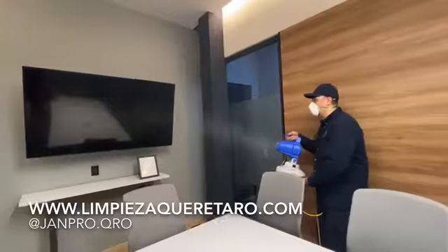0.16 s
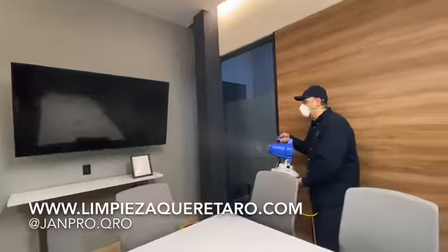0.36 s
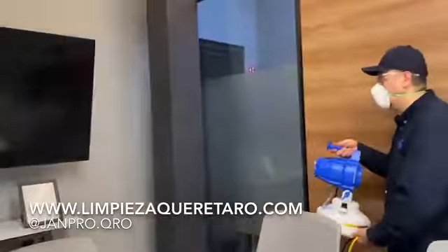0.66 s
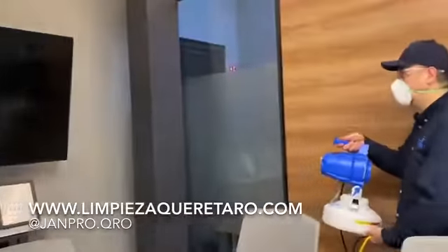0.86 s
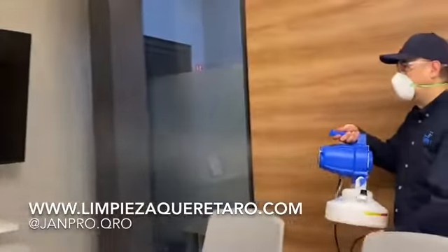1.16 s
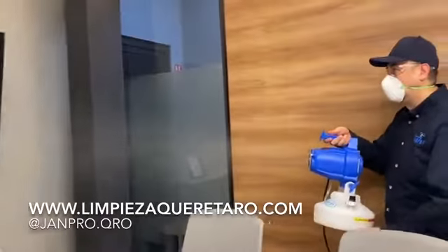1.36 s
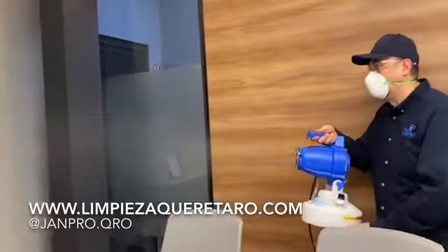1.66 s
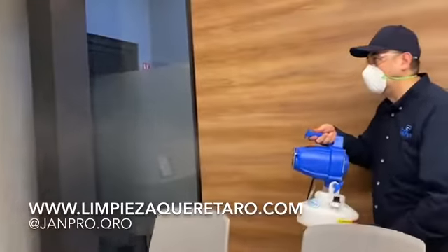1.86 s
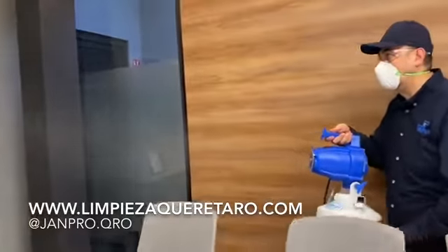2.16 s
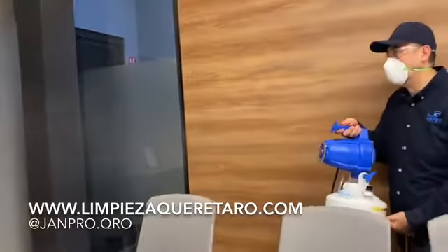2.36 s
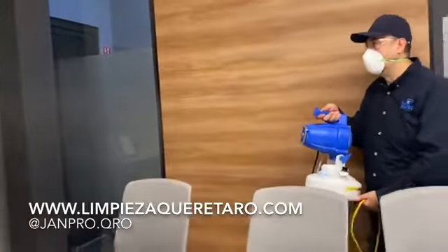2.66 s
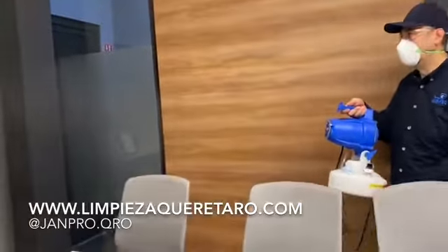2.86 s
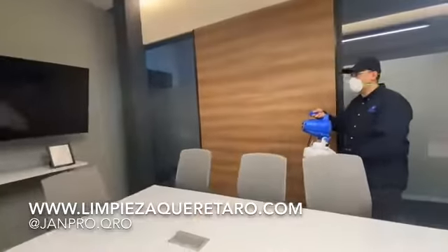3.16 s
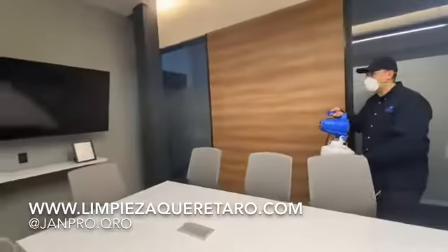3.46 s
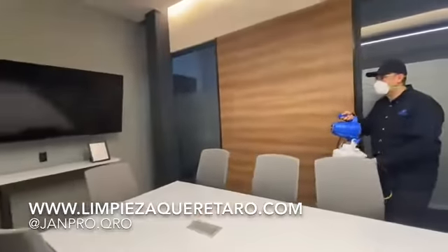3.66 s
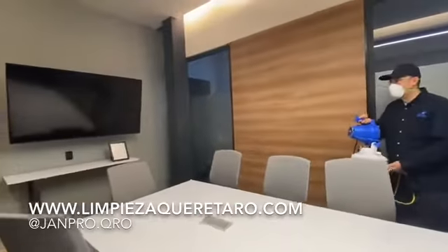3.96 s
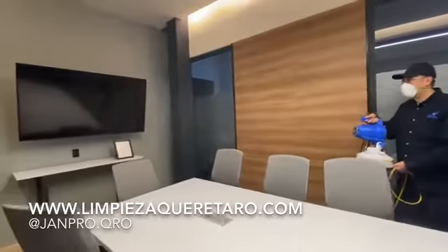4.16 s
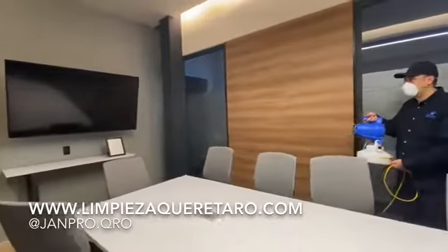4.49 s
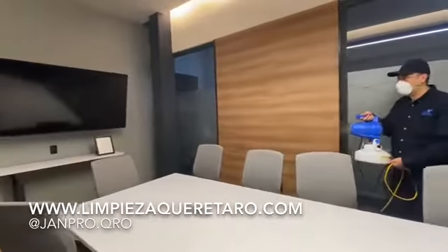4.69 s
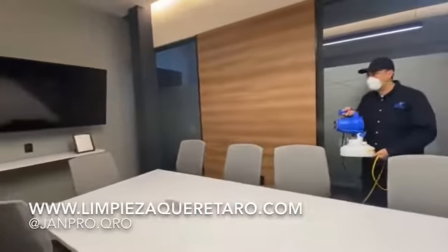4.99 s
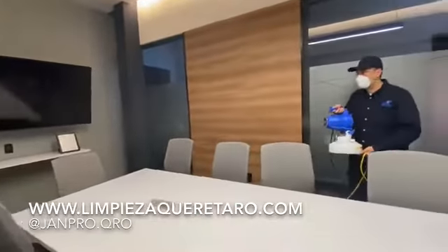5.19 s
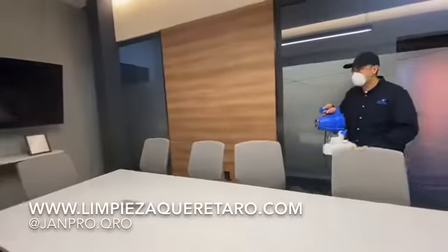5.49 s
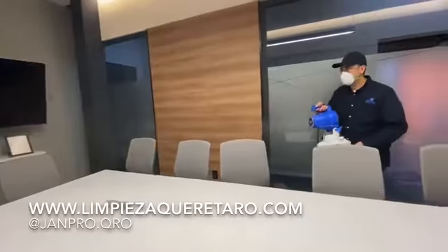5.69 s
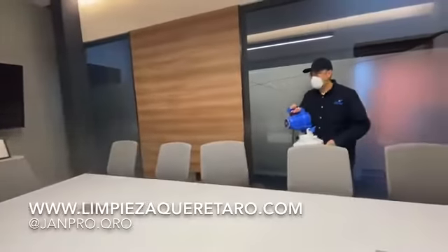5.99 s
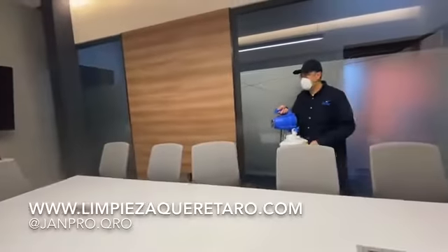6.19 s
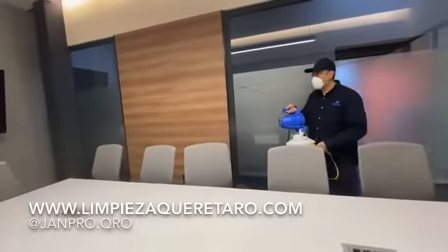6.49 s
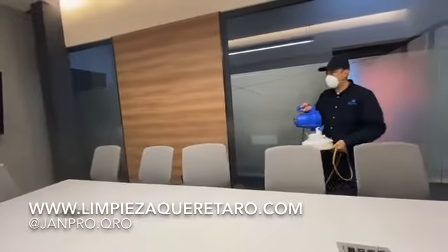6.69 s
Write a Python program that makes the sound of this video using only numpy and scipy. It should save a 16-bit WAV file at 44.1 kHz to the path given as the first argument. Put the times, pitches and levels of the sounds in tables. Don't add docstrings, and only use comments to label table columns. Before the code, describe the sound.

For about 6.8 seconds a handheld electric fogger runs without pause in a carpeted meeting room, a few metres from a stereo phone microphone. A dense, bright air-jet hiss fills the upper range at almost constant level, subtly flickering as room echoes shift with the walking operator. Far below it sits a dull, low-mid housing roar with little deep bass. From about 0.7 to 3.0 seconds the pickup narrows, changing stereo spread and colour slightly without a real loudness jump; then it opens wide again. A faint fan tone near 1170 hertz swells every fraction of a second, drifting between sides and rising almost imperceptibly. A needle-thin whine around 10.5 kilohertz flashes irregularly, notably at 0.6 seconds, then strongest on the left near 4.2, 5.2 and 6.2. Very faint motor hum lies buried. The sound cuts off mid-spray.

```python
import sys
import numpy as np
from scipy import signal
from scipy.fft import rfft, irfft, next_fast_len
from scipy.io import wavfile
from scipy.ndimage import uniform_filter1d

SR = 44100
rng = np.random.default_rng(int(sys.argv[2]) if len(sys.argv) > 2 else 0)


def generate_wav(signal):
    frames = np.transpose(np.atleast_2d(signal))
    scaled = np.clip(frames, -1, 1) * 32767
    pcm = np.round(scaled).astype(np.int16)
    wavfile.write(sys.argv[1], SR, pcm)


def voltage_ratio(level):
    return 10 ** (np.asarray(level, float) / 20)


N = 301644

# t/s, jet level/dB
FLOW = [(0.0, -39), (.65, -39), (.75, -40), (1.6, -39.5), (2.97, -40), (3.03, -39.5), (3.8, -39.9),
        (4.15, -39.6), (5.2, -39.5), (5.6, -39.5), (6.1, -39.5), (6.84, -39.5)]
# t/s, zoom/0-1
ZOOM = [
    (0, 0.04),
    (.67, 0),
    (.72, 0.98),
    (2.97, 0.96),
    (3.02, 0),
    (6.84, 0.01),
]
# f/Hz, density/dB per Hz
JET_WIDE = [(700, -51.5), (1400, -14), (2000, -10), (2700, -10.5), (3200, -6.5), (4600, -7), (5400, -4.5),
            (7000, -6.5), (8600, -5), (9700, -1), (10500, 1), (12000, -1.5), (13200, 0.6), (15600, -4)]
JET_ZOOMED = [(700, -45), (1400, -13), (2000, -9.5), (2700, -11.5), (3200, -7), (4600, -6), (5400, -3.5),
              (7000, -4), (8600, -3), (9700, -1), (10500, 1), (12000, -0.9), (13200, 0.6), (15600, -1)]
# f/Hz, density/dB per Hz
ROAR = [(15, -76), (25, -46), (91, -25), (157, -19), (229, -14), (370, -12.5), (498, -10.5), (569, -4.5),
        (1080, -1), (1160, -3.5), (1300, -5.5), (1690, -30), (2860, -120)]
# f/Hz, width/Hz, lift/dB
HOUSING = [(108, 9.9, 7), (157, 13, 1), (322, 13, 4.5), (378, 7.2, 5), (433.3, 6.5, 9.5), (482, 8, 5.5),
           (573, 12, 3.5)]
# f/Hz, likeness/0-1, left lead/rad, left minus right/dB
PAIR_WIDE = [(120.0, 0.82, 0.0, 0.0), (350.0, 0.68, 0.2, -0.4), (750.0, 0.71, 0.1, 1.0),
             (1000.0, 0.42, 0.1, 1.1), (1500.0, 0.06, 0.2, 2.0), (2800.0, 0.23, -2.7, 1.3),
             (4400.0, 0.2, -2.9, -0.4), (6000.0, 0.11, -5.4, 0.8), (9000.0, 0.12, -5.9, 1.9),
             (10300.0, 0.18, -2.8, 2.7), (11200.0, 0.29, -0.5, 2.3), (12800.0, 0.42, 0.7, 0.8),
             (14200.0, 0.28, 2.9, 0.5), (15500.0, 0.25, 3.9, -0.8)]
PAIR_ZOOMED = [(120.0, 0.82, -0.0, -0.1), (350.0, 0.85, 0.1, -0.7), (750.0, 0.8, 0.2, 0.2),
               (1000.0, 0.59, 0.3, 0.3), (1500.0, 0.42, 0.5, 1.4), (2800.0, 0.24, -0.5, -0.0),
               (4400.0, 0.19, -0.5, 0.2), (6000.0, 0.28, 0.5, -0.2), (9000.0, 0.39, 0.1, 0.5),
               (10300.0, 0.22, -0.4, 1.2), (11200.0, 0.2, -1.1, 1.0), (12800.0, 0.53, 0.3, -1.0),
               (14200.0, 0.28, -1.5, -1.6), (15500.0, 0.52, -1.9, -0.8)]
# t/s, blade rate f/Hz
SPEED = [
    (0.0, 1170.2),
    (2.8, 1169.9),
    (4.0, 1172.5),
    (4.8, 1172.9),
    (5.6, 1172.2),
    (6.84, 1173.5),
]
# t/s, length/s, left level/dB, right level/dB, left lead/rad
BLADE = [(0.1, .45, -59, -53, -2.8), (.57, .33, -56, -54, -3.0), (.91, .31, -58, -49, -.3),
         (1.17, .31, -53, -53, 0.0), (1.65, .55, -58, -51, -.7), (2.22, .4, -72, -50, -2.0),
         (2.5, .35, -50, -70, -1.5), (2.78, .2, -62, -60, -.5), (3.06, .36, -51, -49, .7),
         (3.75, .6, -57, -52, 2.5), (4.42, .36, -59, -55, 4.7), (4.67, .26, -50, -56, 7.4),
         (4.85, .31, -48, -65, 3.8), (5.2, .42, -55, -52, 3.6), (5.58, .42, -51, -54, 6.8),
         (5.92, .44, -54, -56, 3.6), (6.23, .32, -53, -58, 5.2), (6.48, .25, -56, -52, 3.9),
         (6.74, .23, -53, -68, 4.9)]
# t/s, length/s, left level/dB, right level/dB, left lead/rad
COMMUTATOR = [(.35, .12, -47, -50, 5.0), (.58, .18, -39, -41, 5.5), (.87, .19, -48, -49, 7.4),
              (1.41, .16, -44, -58, 4.5), (1.74, .22, -45, -49, 2.0), (2.1, .3, -45, -49, 1.2),
              (2.6, .2, -43, -47, .7), (3.04, .14, -41, -48, 4.1), (3.47, .3, -43, -45, 3.9),
              (3.67, .11, -40, -47, 1.0), (3.86, .18, -45, -52, 4.5), (4.19, .18, -37, -49, 5.8),
              (4.48, .22, -46, -48, 5.0), (4.81, .24, -42, -54, 5.3), (5.16, .28, -33, -47, 1.9),
              (5.64, .15, -38, -50, 4.4), (6.23, .2, -33, -41, 4.9), (6.49, .2, -41, -47, 4.1),
              (6.75, .18, -41, -44, 4.1)]
# t/s, 4th
# order level/dB, 12th order level/dB
SHAFT_ORDERS = [(0.0, -72, -58), (1.2, -70, -65), (3.5, -73, -67), (3.9, -65, -66), (4.7, -63, -68),
                (5.75, -70, -64), (6.05, -66, -57), (6.55, -57, -61), (6.84, -61, -63)]
# t/s, level/dB
HUM = [(0.0, -79), (.6, -81), (1.1, -76), (1.9, -78), (2.3, -72), (3.2, -69), (4.6, -67), (4.8, -72),
       (5.3, -69.5), (6.0, -83), (6.47, -71), (6.84, -78)]

ROAR_BELOW_JET_DB, ROAR_GUST_DB = -19.5, 1.0
EDGE_HZ = 9500
EDGE_WIDE_DB, EDGE_ZOOMED_DB, EDGE_SWAY_DB = 1.4, .3, .25
WHINE_BED_DB, WHINE_FADE_DB, WHINE_SWAY_RAD = -54, 4.0, 1.5
HUM_HZ, HUM_FLUTTER_DB = 240.0, 1.1
LOW_CUT_HZ, CUTOFF_HZ = 46, 15730


def air_flow():
    jet_db, = in_time(FLOW)
    zoom = np.clip(in_time(ZOOM)[0], 0, 1)
    roar_db = jet_db + ROAR_BELOW_JET_DB + ROAR_GUST_DB * drift(8.2)
    edge_db = EDGE_WIDE_DB * (1 - zoom) + EDGE_ZOOMED_DB * zoom + EDGE_SWAY_DB * drift(6.0)
    out = 0
    for weight, jet, pair in ((1 - zoom, JET_WIDE, PAIR_WIDE), (zoom, JET_ZOOMED, PAIR_ZOOMED)):
        hiss = jet_hiss(jet, pair, jet_db, edge_db)
        roar = voltage_ratio(roar_db) * housing_roar(pair)
        out = out + np.sqrt(weight) * (hiss + roar)
    return out


def jet_hiss(jet, pair, jet_db, edge_db):
    centres_hz = np.geomspace(1200, 15000, 6)
    gains = [voltage_ratio(jet_db + edge_db * (centre > EDGE_HZ)) for centre in centres_hz]
    hz, both = air(jet, pair, 1400, 9000)
    return gusty(hz, both, centres_hz, gains, patchy_db=.15)


def gusty(hz, both, centres_hz, gains, patchy_db):
    out = 0
    for k, gain in enumerate(gains):
        share = np.interp(np.log(hz + 1), np.log(centres_hz), np.arange(len(centres_hz)) == k)
        flicker = voltage_ratio(patchy_db * (drift(3.1) + drift(18.0)))
        band = irfft(share * both, next_fast_len(N))[:, :N]
        out = out + gain * flicker * band
    return out


def housing_roar(pair):
    hz, both = air(ROAR, pair, 340, 937)
    lift_db = 0
    for centre_hz, width_hz, db in HOUSING:
        lift_db = lift_db + db / (1 + (2 * (hz - centre_hz) / width_hz) ** 2)
    return irfft(both * voltage_ratio(lift_db), next_fast_len(N))[:, :N]


def air(spectrum, pair, low_hz, high_hz):
    size = next_fast_len(N)
    hz = np.arange(size // 2 + 1) * SR / size
    shared, own = rfft(rng.standard_normal((2, size)))
    alike, lead_rad, pan_db = at_hz(pair, hz)
    alike = np.clip(alike, 0, .97) ** .8
    colour = voltage_ratio(at_hz(spectrum, hz)[0])
    right_noise = alike * np.exp(-1j * lead_rad) * shared + np.sqrt(1 - alike ** 2) * own
    left = colour * voltage_ratio(pan_db / 2) * shared
    right = colour * voltage_ratio(-pan_db / 2) * right_noise
    inside = (hz > low_hz) & (hz < high_hz)
    mid_rms = np.sqrt(2 * np.sum(np.abs(left + right)[inside] ** 2) / 4) / size
    return hz, np.array([left, right]) / mid_rms


def motor():
    blade_rad = 2 * np.pi * np.cumsum(in_time(SPEED)[0]) / SR
    return blade_tone(blade_rad) + commutator_whine(blade_rad) + shaft_orders(blade_rad) + mains_hum()


def blade_tone(blade_rad):
    return np.imag(swells(BLADE) * np.exp(1j * blade_rad))


def commutator_whine(blade_rad):
    whine_rad = 9 * blade_rad + .25 * drift(8.0)
    flashes = np.imag(swells(COMMUTATOR) * np.exp(1j * whine_rad))
    left_db = WHINE_BED_DB + WHINE_FADE_DB * drift(5.0)
    right_db = WHINE_BED_DB + WHINE_FADE_DB * drift(5.0)
    bed_rad = whine_rad + WHINE_SWAY_RAD * drift(2.0)
    bed = tone(bed_rad, left_db, right_db, WHINE_SWAY_RAD * drift(3.0))
    return voltage_ratio(2.0 * drift(22.0)) * (flashes + bed)


def shaft_orders(blade_rad):
    fourth_db, twelfth_db = np.array(in_time(SHAFT_ORDERS)) - 3 + 3 * drift(4.0)
    fourth = tone(2 / 3 * blade_rad + 1.3 * drift(6.0), fourth_db, fourth_db, .5 * drift(.8))
    twelfth = tone(2 * blade_rad + 1.3 * drift(8.0), twelfth_db, twelfth_db - 3, 1.5 * drift(.8))
    return fourth + twelfth


def mains_hum():
    hum_db = in_time(HUM)[0] + HUM_FLUTTER_DB * drift(3.5)
    return tone(2 * np.pi * HUM_HZ * np.arange(N) / SR, hum_db, hum_db, 0)


def swells(rows):
    s, length_s, left_db, right_db, lead_rad = np.transpose(rows)[:, :, None]
    t = np.arange(0, N + 100, 100)
    bell = np.sqrt(2) * 2. ** -(2 * (t / SR - s) / length_s) ** 2
    left = voltage_ratio(left_db) * np.exp(.5j * lead_rad)
    right = voltage_ratio(right_db) * np.exp(-.5j * lead_rad)
    return np.array([np.interp(np.arange(N), t, np.sum(bell * side, 0)) for side in (left, right)])


def tone(phase_rad, left_db, right_db, lead_rad):
    left = voltage_ratio(left_db) * np.sin(phase_rad + lead_rad / 2)
    right = voltage_ratio(right_db) * np.sin(phase_rad - lead_rad / 2)
    return np.sqrt(2) * np.array([left, right])


def echoes(x, depth_db, width_bins, length_frames):
    frames = signal.stft(x, nperseg=2048, noverlap=1536)[2]
    field = rng.standard_normal(frames.shape)
    field[:, :40] = field[0, :40]
    for _ in range(2):
        field = uniform_filter1d(field, max(round(width_bins), 1), axis=1)
        field = uniform_filter1d(field, max(round(length_frames), 1), axis=2)
    field /= field.std(axis=(0, 2), keepdims=True)
    field[:, :40] *= .6
    gain = voltage_ratio(depth_db * field)
    gain = gain / np.sqrt(np.mean(gain ** 2))
    return signal.istft(frames * gain, nperseg=2048, noverlap=1536)[1][:, :N]


def in_time(rows):
    s, *columns = np.transpose(rows)
    return [np.interp(np.arange(N) / SR, s, c) for c in columns]


def at_hz(rows, hz):
    points_hz, *columns = np.transpose(rows)
    return [np.interp(np.log(hz + 1), np.log(points_hz), c) for c in columns]


def drift(rate_hz):
    r = np.exp(-80 * np.pi * rate_hz / SR)
    noise = rng.standard_normal(N // 40 + 2002)
    slow = signal.lfilter([1], [1, -2 * r, r * r], noise)[2000:]
    return np.interp(np.arange(N) / 40, np.arange(len(slow)), slow / slow.std())


def scene():
    return echoes(air_flow(), depth_db=2.5, width_bins=3.0, length_frames=9.0) + motor()


def roll_off(x):
    return signal.sosfilt(signal.butter(12, 17060, fs=SR, output="sos"), x)


def record(dry):
    size = next_fast_len(N)
    hz = np.arange(size // 2 + 1) * SR / size
    passed = (hz < CUTOFF_HZ) / np.sqrt(1 + (LOW_CUT_HZ / (hz + 1)) ** 6)
    mix = irfft(rfft(dry, size) * passed, size)[:, :N]
    return roll_off(mix)


dry = scene()
out = record(dry)
generate_wav(out)
```